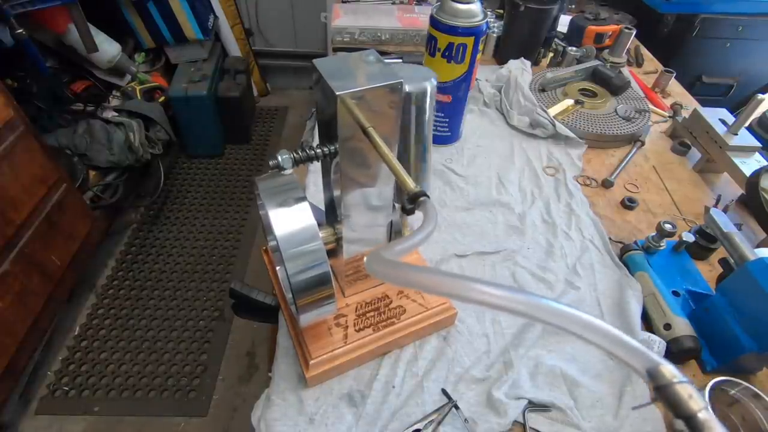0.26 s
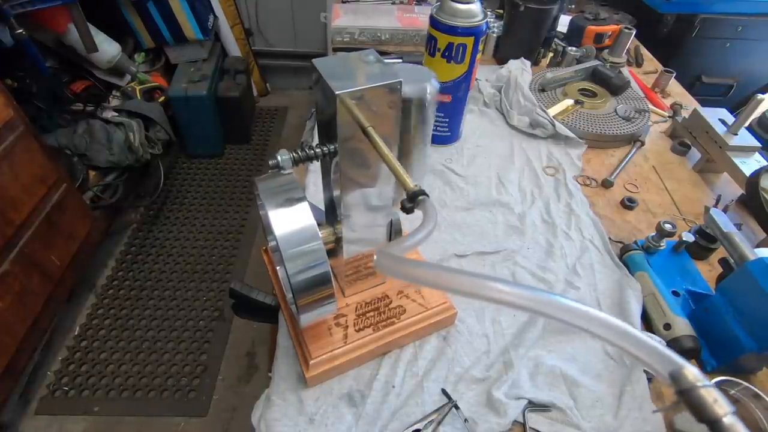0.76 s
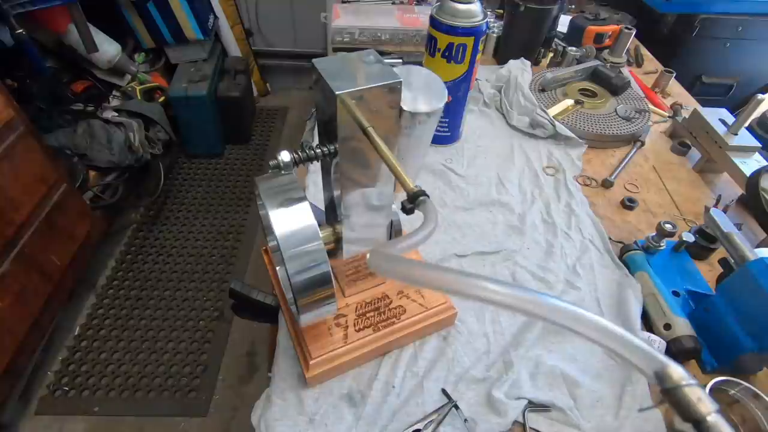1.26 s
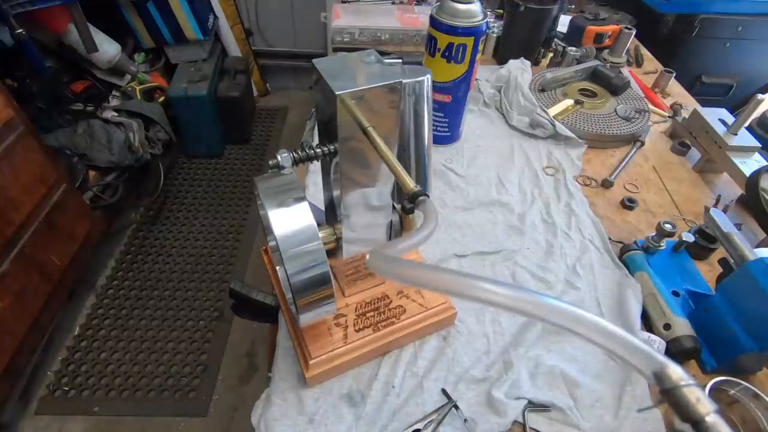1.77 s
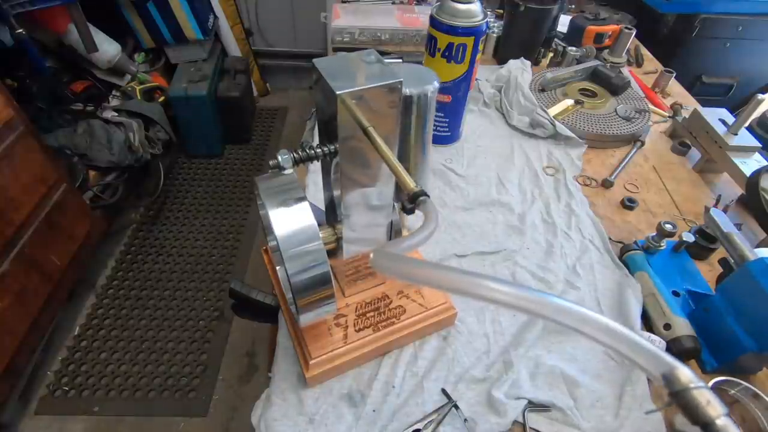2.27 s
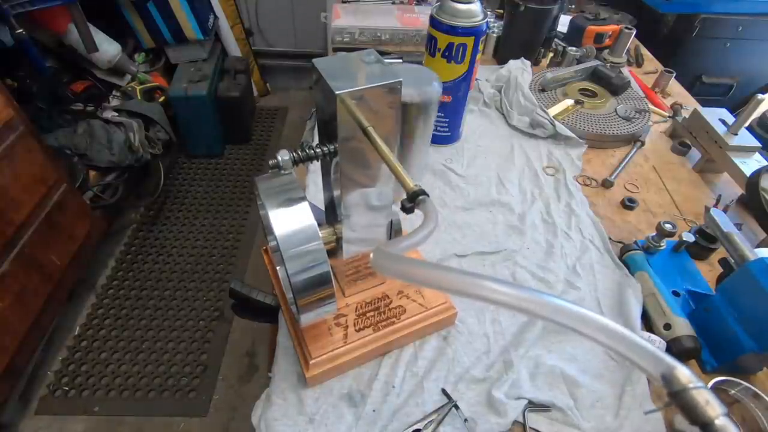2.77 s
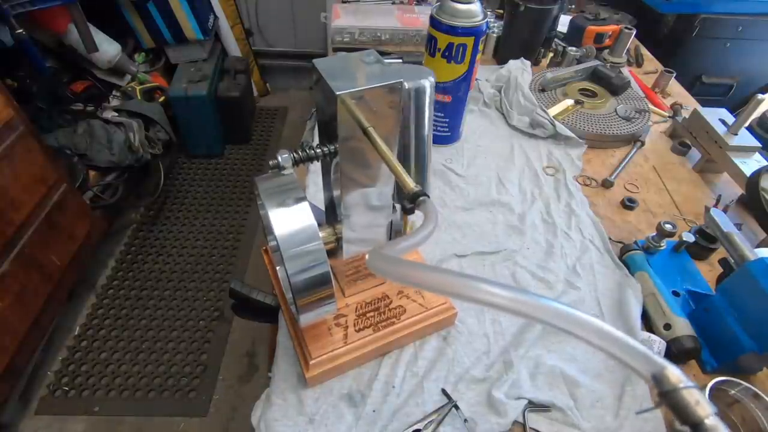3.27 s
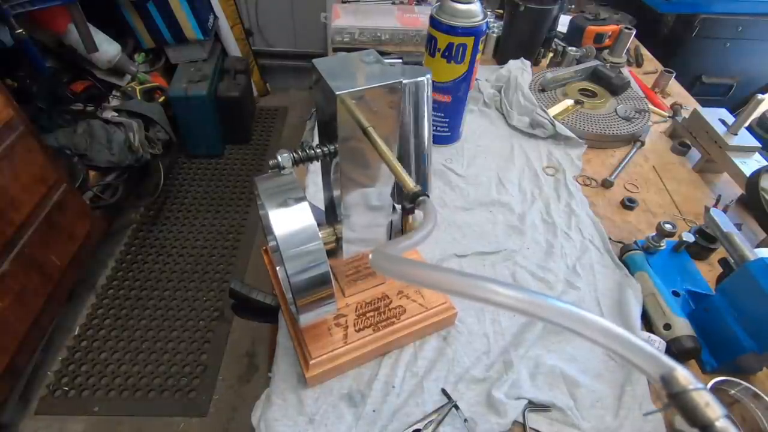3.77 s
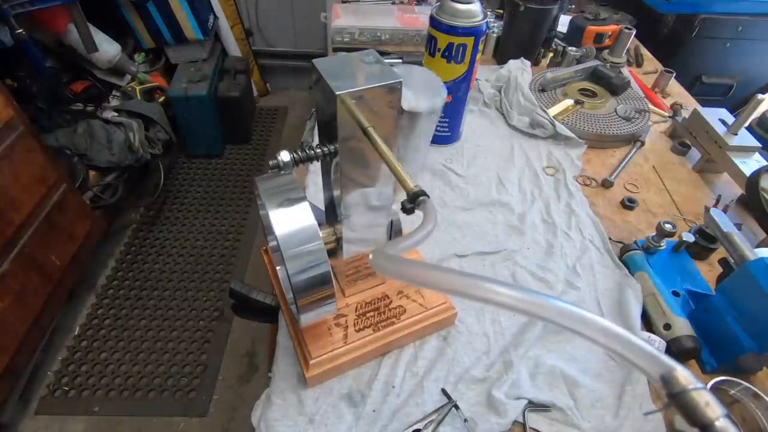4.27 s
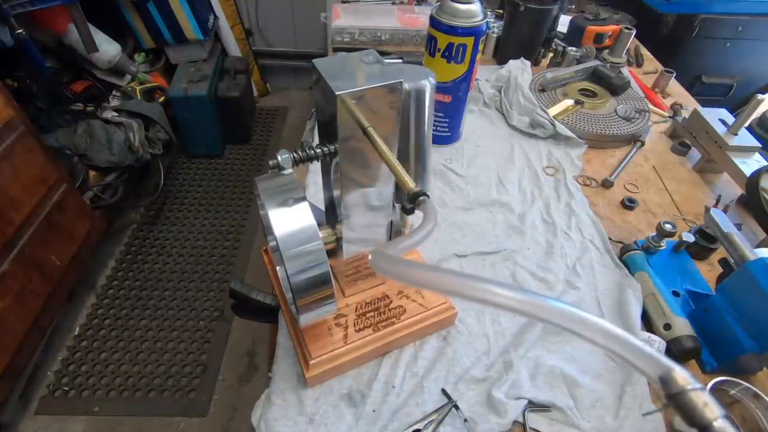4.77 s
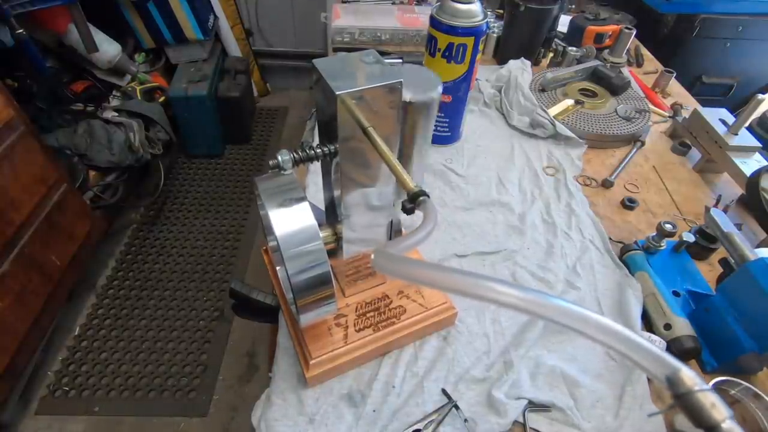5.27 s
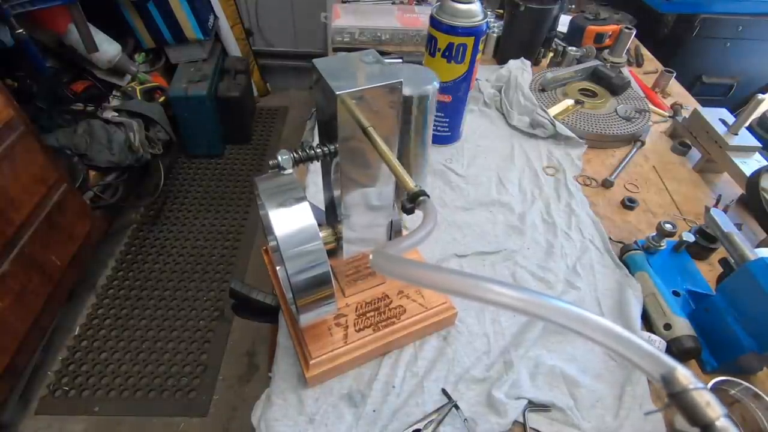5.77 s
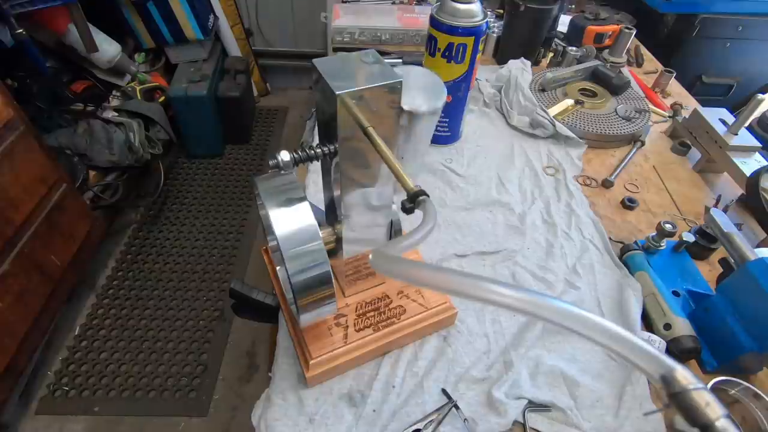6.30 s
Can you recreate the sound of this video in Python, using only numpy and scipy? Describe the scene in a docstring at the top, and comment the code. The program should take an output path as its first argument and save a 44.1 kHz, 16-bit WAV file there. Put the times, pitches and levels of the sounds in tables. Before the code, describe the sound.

Rapid buzzing puffs of air, metallic rattle and bench thumps from a tiny air-driven engine, surging loudly and dropping back to uneven idling.

```python
"""Workshop bench, close up and in stereo: a small oscillating-cylinder engine runs on compressed air.
It makes 14-24 turns a second. Each turn the ports hiss and chuff (shaped noise), the piston thumps
base and bench (ringing modes), and loose bearings clatter (bursts of frame noise and wheel modes).
The air comes in six surges: the piston knocks and the flywheel mostly gains speed,
then the engine idles on a weaker flow and mostly slows."""
import sys
import numpy as np
from scipy import signal
from scipy.fft import rfft, irfft, next_fast_len
from scipy.io import wavfile
from scipy.ndimage import uniform_filter1d

SR = 44100
rng = np.random.default_rng(int(sys.argv[2]) if len(sys.argv) > 2 else 0)


def to_wav(sig):
    """Store sig (one row per channel, or 1-D mono) as 16-bit WAV at the path in sys.argv[1].

    Samples outside -1..1 are clipped; the rate is SR.
    """
    pcm = np.clip(np.atleast_2d(sig), -1, 1) * 32767
    pcm = np.round(pcm).astype(np.int16)
    wavfile.write(sys.argv[1], SR, pcm.T)  # frames by channels


N = 288394
TIME = np.arange(N) / SR


def from_db(db):
    """Amplitude ratio of a level in dB."""
    return 10 ** (np.asarray(db) / 20)


def rms_one(x):
    """The same sound at rms 1."""
    return x / np.sqrt(np.mean(x ** 2) + 1e-20)


def in_time(rows):
    """Every column of a table whose first column is time, drawn as straight lines over the scene."""
    s, *columns = np.transpose(rows)
    return [np.interp(TIME, s, column) for column in columns]


def at_hz(points, hz):
    """A curve read on a logarithmic pitch axis."""
    point_hz, values = np.transpose(points)
    return np.interp(np.log(hz + 1), np.log(point_hz), values)


def noise(spectrum, likeness, size=N):
    """Stereo noise of a given colour and left-right likeness, falling away below its first point; rms 1."""
    padded = next_fast_len(size, True)
    hz = np.arange(padded // 2 + 1) * SR / padded
    mid, side = rfft(rng.standard_normal((2, padded)))
    alike = np.clip(at_hz(likeness, hz), -1, 1)
    gain = from_db(at_hz(spectrum, hz)) * np.minimum(hz / spectrum[0][0], 1) ** 2
    left_right = np.sqrt(1 + alike) * mid + np.sqrt(1 - alike) * side * [[1], [-1]]
    return rms_one(irfft(gain * left_right, padded)[:, :size])


def ring(force, hz, t60):
    """A two-pole resonance: a unit click sets a sine of height about 1 ringing, down 60 dB after t60."""
    r = from_db(-60 / (t60 * SR))
    w = 2 * np.pi * hz / SR
    return signal.lfilter([0, np.sin(w)], [1, -2 * r * np.cos(w), r * r], force + 1e-18)


def ring_with(burst, hits):
    """Every hit sets off the same stereo burst, scaled by its strength."""
    return signal.oaconvolve(hits[None], burst, axes=1)[:, :N]


def evened(x):
    """The same sound with its level held at 1 over a few turns."""
    power = uniform_filter1d(uniform_filter1d(np.mean(x ** 2, axis=0), size=4000), size=2600)
    return x / np.sqrt(np.maximum(power, 1e-12))


# workshop background spectrum: pitch_hz, level_db per Hz (relative)
SHOP_SPECTRUM = [(25, 5), (100, 11), (300, -1.5), (1000, -18), (4000, -44), (10000, -36), (14000, -91)]
# left-right likeness of workshop and frame: pitch_hz, correlation
FRAME_STEREO = [(400, -0.38), (800, -0.25), (1300, 0.0055), (1900, 0.6), (3000, 0.78)]
SHOP_DB = -27.5


def shop():
    """The workshop's steady, mostly low background: coloured noise."""
    return from_db(SHOP_DB) * noise(SHOP_SPECTRUM, FRAME_STEREO)


# speed of the flywheel: time_s, speed_turns_per_s
WHEEL_SPEED = [(0.0, 20.252), (0.4, 22.849), (0.76, 23.156), (0.77, 21.411), (0.91, 17.86), (1.22, 22.486),
               (1.66, 23.621), (2.34, 23.371), (2.34, 22.051), (2.51, 19.228), (2.79, 22.273),
               (3.12, 17.068), (3.34, 20.884), (3.57, 17.314), (3.85, 15.845), (4.1, 17.263),
               (4.83, 16.849), (4.83, 17.885), (5.03, 20.777), (5.19, 20.716), (5.44, 13.776),
               (5.66, 17.976), (5.79, 16.717), (6.54, 15.175)]
START_TURNS = .785  # where the crank stands at the start, in turns past a chuff


def crank_angle(speed):
    """Turns of the flywheel, summed from its speed; a whole number at each chuff."""
    return START_TURNS + np.cumsum(speed) / SR


# full charges of air: start_s, build_up_s, end_s, exhaust_db
FULL_CHARGES = [(-.06, .05, .685, -19.5), (.9, 0.066, 2.26, -20.1), (2.46, .12, 2.77, -20.3),
                (3.1, .09, 3.285, -19), (4.74, 0.077, 5.15, -20), (5.425, .06, 5.56, -20.5)]
# the weaker air flow between surges: time_s, exhaust_db
IDLE_FLOW = [(.85, -33), (2.43, -29), (2.85, -28.5), (3.07, -32.5), (3.55, -32.5), (3.72, -30.5),
             (3.98, -22.5), (4.3, -24.5), (4.75, -25), (5.15, -29.5), (5.29, -50), (5.38, -44),
             (5.6, -29.5), (6.15, -28), (6.5, -26)]
# a surge starts above its level, settles and lets go
OVERSHOOT_DB, SETTLE_S, SURGE_RELEASE_S = 1.05, 0.32, 0.073


def air_flow():
    """Exhaust level in dB: each surge lifts the idle flow to a full charge, holds it and lets it fall back."""
    idle_db, = in_time(IDLE_FLOW)
    flow_db = idle_db
    for start, build_up, end, db in FULL_CHARGES:
        age = np.maximum(TIME - start, 0)
        release = np.exp(-np.maximum(TIME - end, 0) / SURGE_RELEASE_S)
        held = np.minimum(age / build_up, 1) * release
        surge_db = db + OVERSHOOT_DB * np.exp(-age / SETTLE_S)
        flow_db = flow_db + held * (surge_db - idle_db)
    return flow_db


# what the air flow does to the engine: exhaust_db, knock_db, bench_shaking_db, clatter_db
FLOW_RESPONSE = [(-51, -68, -32.5, -44.5), (-32.5, -55, -29.5, -38.5), (-27, -51, -27.2, -35.3),
                 (-24.5, -39, -20.5, -30.5), (-19.5, -23, -19.0, -27.7), (-17.5, -20, -18, -30)]


def response(flow_db):
    """Levels of knock, bench shaking and clatter at a given air flow."""
    flows, *levels = np.transpose(FLOW_RESPONSE)
    return [np.interp(flow_db, flows, db) for db in levels]


def strokes(crank, speed, flow_db):
    """For each turn: the time of its chuff, its air flow in dB, and the turns per second that it gains."""
    turn = np.arange(1, int(crank[-1]) + 1)
    s = np.interp(turn, crank, TIME)
    gain = np.interp(turn + .5, crank, speed) - np.interp(turn - .5, crank, speed)
    return s, np.interp(s, TIME, flow_db), np.clip(gain, 0, 1.2)


def over_strokes(values):
    """The flywheel carries each stroke's state into its neighbours."""
    return np.convolve(np.pad(values, 1, mode="edge"), [1 / 6, 4 / 6, 1 / 6], "valid")


def blows(crank, turns, scatter_db, jitter_s, strength=1):
    """One click each time the crank passes an angle, with a strength for each stroke."""
    count = int(crank[-1])
    chance = rng.standard_normal((count, 2))
    s = np.interp(np.arange(count) + 1 + turns, crank, TIME, left=-1, right=-1)
    at = np.round((s + jitter_s * chance[:, 0]) * SR).astype(int)
    inside = (at >= 0) & (at < N)
    heights = strength * from_db(scatter_db * chance[:, 1])
    return np.bincount(at[inside], heights[inside], N)


# hum of crank and piston: multiple of the turning rate, coasting_db, driven_db
SWINGING_MASSES = [(2, -15.5, -34), (3, -31, -30)]
# the bench sways most easily at one pitch: where, how wide, how much more
SWAY_HZ, SWAY_WIDTH_HZ, SWAY_DB = 31.6, 1.1, 10


def unbalance(crank, speed, shake_db, drive):
    """The swinging masses hum at low multiples of the turning rate, louder where they meet the bench's sway."""
    angle = 2 * np.pi * crank
    lag = np.array([[1.2], [0]])  # radians: the left side hears it later
    hum = 0
    for multiple, coasting_db, driven_db in SWINGING_MASSES:
        off_sway = (multiple * speed - SWAY_HZ) / SWAY_WIDTH_HZ
        sway_db = SWAY_DB / (1 + off_sway ** 2)
        level = from_db(coasting_db + drive * (driven_db - coasting_db) + sway_db)
        hum = hum + level * np.cos(multiple * angle - lag)
    return from_db(shake_db) * hum * from_db([[-4], [3]])


# modes of base and bench: pitch_hz, t60_s, signed coupling to each of the four forces,
# signed radiation left, right
BENCH_MODES = [(33, 0.21, 0.7, 1.3, 1.5, 0.62, -0.24, 0.83), (66.6, 0.24, 1, 1, -0.2, 0.13, -0.3, 0.88),
               (88.4, 0.29, -1.5, 1, 2.5, 2.16, -0.33, 0.97),
               (95.7, 0.13, 2.5, -2.5, -4, -0.69, -0.029, 0.89),
               (124.2, 0.27, -0.84, 0.45, 1.7, -0.16, 0.087, 1),
               (139.7, 0.11, -0.04, 1.08, -0.6, -0.76, 0.84, 0.63),
               (171, 0.12, -1.88, 0.4, 0, -0.8, -0.27, 0.92),
               (203.3, 0.17, -1.0, 0.12, 0.59, 0.42, 0.99, 0.42),
               (254.4, 0.17, -0.88, 0.13, 1.73, 0.36, 0.27, 0.52),
               (273.5, 0.091, 1.68, 0.39, -1.78, -0.89, 0.35, 0.96),
               (318.6, 0.19, -1.12, 0.69, 1.7, 0.64, -0.15, 0.9),
               (335.1, 0.15, 1.13, 0.19, 0.47, 0.3, 0.28, 0.4),
               (489, 0.15, 0.32, 0.27, 0.95, -0.46, 0.9, -0.44),
               (620, 0.1, -0.26, -0.03, 0.48, -0.097, 0.89, -0.16)]
# forces on the base, in turns from the chuff: charge, release, and the two reversals of a coasting piston
FORCE_ANGLES = [.409, -.162, .323, -.104]


def bench(crank, shake_db, drive):
    """Air pressure shakes the base on driven strokes, the piston's own mass when it coasts."""
    shares = [drive, drive, 1 - drive, 1 - drive]
    forces = np.array([blows(crank, turns, scatter_db=.3, jitter_s=.00003, strength=share * from_db(shake_db))
                       for turns, share in zip(FORCE_ANGLES, shares)])
    out = 0
    for hz, t60, *coupling, left, right in BENCH_MODES:
        out = out + np.outer([left, right], ring(np.dot(coupling, forces), hz, t60))
    # the slowest motion hardly radiates
    highpass = signal.butter(1, 14, "high", fs=SR, output="sos")
    return from_db(1.15) * signal.sosfilt(highpass, out)


# the whole engine rocks when a stroke speeds it up: pitch_hz, level_db, t60_s
ROCKING_MODES = [(44, -4, 0.077), (61, -3, 0.073), (81, 4, 0.096)]


def lurch(crank, shake_db, gain):
    """A stroke that gains speed kicks the base back with a deep thump."""
    strength = gain * from_db(shake_db - 4.5)
    kicks = blows(crank, turns=0.125, scatter_db=1.0, jitter_s=0.00012, strength=strength)
    thump = sum(from_db(db) * ring(kicks, hz, t60) for hz, db, t60 in ROCKING_MODES)
    return thump * from_db([[-4], [1.5]])


# dense ringing of the metal frame: pitch_hz, level_db per Hz (relative)
FRAME_SPECTRUM = [(380, -0.5), (500, 0.5), (600, -1), (870, 1.5), (1200, 0), (1650, -3.5), (1900, -2.5),
                  (2700, -7.5), (4000, -6), (8000, -32)]
# the loose engine shifts on its base with a click: start_s, level_db
BASE_CLICKS = [(3.891, -20.5), (3.899, -21)]


def clicks():
    """Each click rings the frame briefly: a decaying burst of frame noise."""
    out = np.zeros((2, N))
    age = TIME[:SR // 10]
    for s, db in BASE_CLICKS:
        at = int(s * SR)
        burst = np.exp(-age / 0.0098) * noise(FRAME_SPECTRUM, FRAME_STEREO, size=len(age))
        out[:, at:at + len(age)] += from_db(db) * burst
    return out


JOLT_DB, JOLT_DECAY_S = -9.5, 0.01  # level against the bench shaking, decay


def jolt(crank, shake_db, gain):
    """On a stroke that gains speed, the knock also jolts the frame."""
    age = TIME[:SR // 10]
    strength = gain * from_db(shake_db + JOLT_DB)
    hits = blows(crank, turns=.385, scatter_db=0.2, jitter_s=0.00021, strength=strength)
    body = np.exp(-age / JOLT_DECAY_S) * noise(FRAME_SPECTRUM, FRAME_STEREO, size=len(age))
    return ring_with(body, hits)


# bearings take up their play: angle in turns from the chuff, coasting_db, driven_db
BEARING_CONTACTS = [(-.28, -4.5, -8), (-.13, 1.5, -8.5), (-.015, 0.5, -10.5), (.365, -2.5, -3.5),
                    (.44, -0.5, -6.5), (.57, -18, 2.5)]
# long-ringing modes of flywheel and frame: pitch_hz, level_db, t60_s
WHEEL_MODES = [(703, 3, 0.15), (875, -2, 0.35), (1042, 15, 0.095), (1199, 0, 0.23), (1386, 11.5, 0.14),
               (1546, 1, 0.15), (1790, -9, .08), (1972, 4, 0.16)]


def clatter(crank, drive):
    """Each bearing contact rings the frame in its own way, alike from turn to turn, over the port face's rub."""
    age = TIME[:SR // 8]
    decay = np.exp(-age / 0.0033) + from_db(-10) * np.exp(-age / 0.037)  # the frame, then the workshop
    rattle, force = 0, 0
    for angle, coasting_db, driven_db in BEARING_CONTACTS:
        level = from_db(coasting_db + drive * (driven_db - coasting_db))
        hits = level * blows(crank, turns=angle, scatter_db=1.2, jitter_s=.00004)
        burst = decay * noise(FRAME_SPECTRUM, FRAME_STEREO, size=len(age))
        rattle = rattle + ring_with(burst, hits)
        force = force + hits
    wheel = 0
    for k, (hz, db, t60) in enumerate(WHEEL_MODES):
        sides = [[(-1) ** k], [-1]]  # the modes reach the two sides in step or opposed, by turns
        wheel = wheel + from_db(db) * ring(force, hz, t60) * sides
    rub = noise(FRAME_SPECTRUM, FRAME_STEREO)
    return evened(rattle) + from_db(-6.0) * evened(wheel) + from_db(-7.0) * rub


# the knock rings in the cylinder: pitch_hz at low speed, level_db, t60_s
CYLINDER_MODES = [(1404, -12, 0.044), (1935, -11, 0.053), (2660, -7.5, 0.015), (3280, -9, 0.029),
                  (3660, 2, 0.015), (3960, 2.5, 0.019)]
# the knock rings flatter at speed: from and to (turns per second), share of its pitch lost
FLAT_FROM, FLAT_TO, KNOCK_FLAT = 20.7, 23.7, .035


def knock(crank, knock_db, speed):
    """A strong charge slams the piston against its pin: a short rough contact and a weaker rebound."""
    strength = from_db(knock_db + 4.0)
    hits = blows(crank, turns=.358, scatter_db=0.3, jitter_s=.0002, strength=strength)
    rebound = blows(crank, turns=.56, scatter_db=0.0, jitter_s=0.00067, strength=strength)
    hits = hits + from_db(-8.5) * rebound
    age = TIME[:SR // 100]
    contact = signal.lfilter(np.exp(-age / 0.0057), [1], hits)
    force = hits + 0.044 * contact * rng.standard_normal(N)
    fast = np.clip((speed - FLAT_FROM) / (FLAT_TO - FLAT_FROM), 0, 1)
    out = 0
    for k, (hz, db, t60) in enumerate(CYLINDER_MODES):
        slow_ring = ring((1 - fast) * force, hz, t60)
        fast_ring = ring(fast * force, (1 - KNOCK_FLAT) * hz, t60)
        out = out + (-1) ** k * from_db(db) * (slow_ring + fast_ring)
    return out


# air flow round one turn: angle in turns from the chuff, level_db
PORT_FLOW = [(-.5, -46), (-.22, -45), (-.185, -0.5), (-.14, 1), (-.08, -6.5), (0, -30), (.5, -58)]
EXHAUST_FLOW = [(-.5, -50), (-.17, -46), (-.08, -6), (-.02, 3.5), (.035, 3.5), (.085, -2), (.13, -33),
                (.25, -29), (.5, -53)]
LEAK_FLOW = [(-.5, -10), (-.25, -20.5), (0, -28), (.2, -19.5), (.27, -12), (.34, -8), (.5, -19)]
# air spectra: pitch_hz, level_db per Hz (relative)
PORT_SPECTRUM = [(900, -14), (2000, -12), (3600, -5), (4500, 0), (5500, -2), (6700, 0), (8000, -10),
                 (9500, -7), (11500, -21), (14500, -33)]
EXHAUST_SPECTRUM = [(400, -0.5), (1600, -14), (2700, -0.5), (4500, -3), (6800, 4), (7900, -3), (8800, 0.5),
                    (10000, -2), (11500, -13), (14500, -24)]
LEAK_SPECTRUM = [(500, 4), (2000, 1), (4000, -7.5), (5300, -0.5), (6700, 7.5), (8000, 0), (10000, -0.5),
                 (11500, -15), (14500, -37)]
# left-right likeness of the air: pitch_hz, correlation
AIR_STEREO = [(400, 0.36), (1400, 0.17), (2500, 0.71), (4200, 1), (6500, 0.38), (10000, 0.39),
              (14500, 0.02)]
# things close to the ports throw the hiss back: delay_s, level_db
PORT_ECHOES = [(.0009, -55), (.0021, -15), (.0034, -22), (.0062, -13)]


def air(crank, exhaust_db, drive):
    """The rocking cylinder cracks a port open, then dumps its charge; air leaks past the port face all the while."""
    def jet(opening, spectrum):
        """Hiss whose level follows the opening round each turn."""
        angle, flow_db = np.transpose(opening)
        return from_db(np.interp(crank, angle, flow_db, period=1)) * noise(spectrum, AIR_STEREO)
    port = from_db(2.5 - 9.8 * drive) * jet(PORT_FLOW, PORT_SPECTRUM)
    exhaust = from_db(-0.11 + .5 * drive) * jet(EXHAUST_FLOW, EXHAUST_SPECTRUM)
    leak = from_db(-0.5 + 1.35 * drive) * jet(LEAK_FLOW, LEAK_SPECTRUM)
    direct = from_db(exhaust_db - 1.5) * (port + exhaust + leak)
    out = direct
    for s, db in PORT_ECHOES:
        out = out + from_db(db) * np.pad(direct, [(0, 0), (int(s * SR), 0)])[:, :N]
    return out


# exhaust levels at which the piston only coasts, and at which it is fully driven
COASTING_DB, DRIVEN_DB = -26, -20
FILL_S = .022  # pressure in the cylinder trails the air flow
# strokes differ by chance
EXHAUST_SCATTER_DB, KNOCK_SCATTER_DB = 0.34, .7
# a stroke that gains speed shakes the bench harder: dB for each turn per second gained
SHAKE_GAIN_DB = 2
# the clatter trails the air flow and grows with speed (dB for each turn per second above the mean)
CLATTER_LAG_S, CLATTER_SPEED_DB = 0.056, 0.35


def scene():
    """Speed times every stroke, and the air flow sets its strength."""
    speed, = in_time(WHEEL_SPEED)
    crank, flow_db = crank_angle(speed), air_flow()
    s, stroke_db, gain = strokes(crank, speed, flow_db)
    # 0 = coasting, 1 = a full charge
    drive = over_strokes(np.clip((stroke_db - COASTING_DB) / (DRIVEN_DB - COASTING_DB), 0, 1))
    drive_now = np.interp(TIME, s, drive)

    chance = rng.standard_normal((len(s), 2))
    knock_db, shake_db, _ = response(np.interp(s - FILL_S, TIME, flow_db))
    exhaust_db = stroke_db + EXHAUST_SCATTER_DB * chance[:, 0]
    knock_db = knock_db + KNOCK_SCATTER_DB * chance[:, 1]
    shake_db = shake_db + SHAKE_GAIN_DB * gain
    _, _, clatter_db = response(np.interp(TIME - CLATTER_LAG_S, TIME, flow_db))
    clatter_db = clatter_db + CLATTER_SPEED_DB * (speed - speed.mean())

    base = unbalance(crank, speed, np.interp(TIME, s, shake_db), drive_now)
    base = base + bench(crank, shake_db, drive) + lurch(crank, shake_db, gain)
    engine = clicks() + jolt(crank, shake_db, gain)
    engine = engine + from_db(clatter_db - 0.88) * clatter(crank, drive_now)
    engine = engine + knock(crank, knock_db, speed)
    engine = engine + air(crank, np.interp(TIME, s, exhaust_db), drive_now)
    return shop() + base + engine * from_db([[-.4], [.4]])


CUTOFF_HZ = 14500


def record(dry):
    """The highest peaks are rounded towards .75, the top is cut steeply."""
    rounded = dry / (1 + (dry / .75) ** 6) ** (1 / 6)
    lowpass = signal.ellip(8, .3, 90, CUTOFF_HZ, fs=SR, output="sos")
    return signal.sosfilt(lowpass, rounded)


dry = scene()
out = record(dry)
to_wav(out)
```